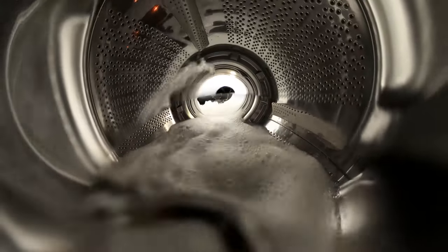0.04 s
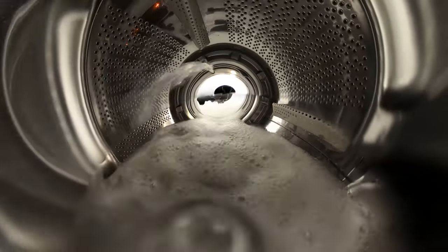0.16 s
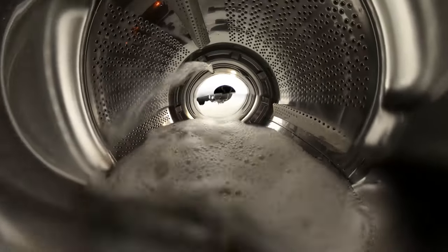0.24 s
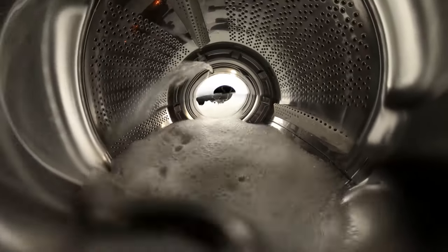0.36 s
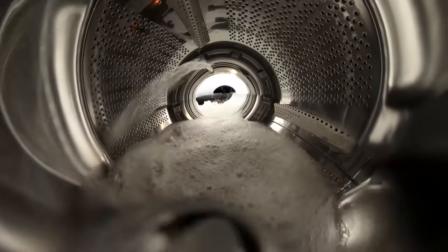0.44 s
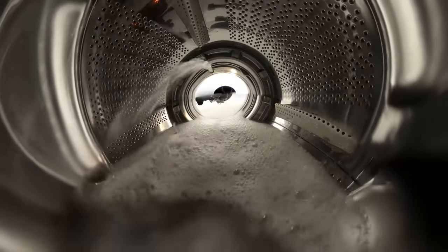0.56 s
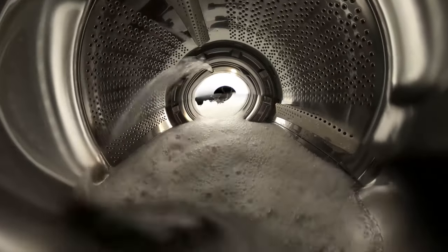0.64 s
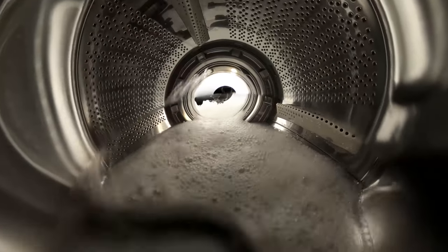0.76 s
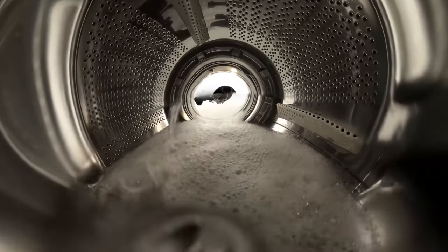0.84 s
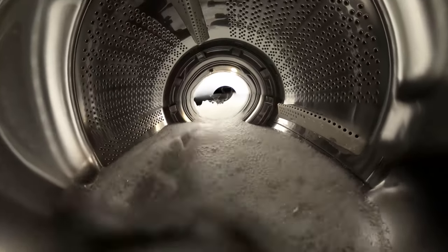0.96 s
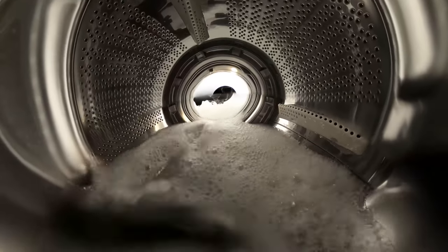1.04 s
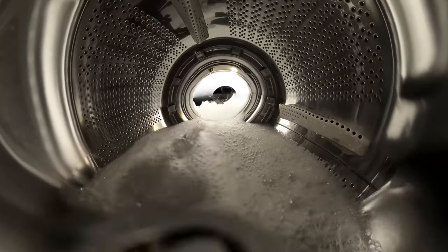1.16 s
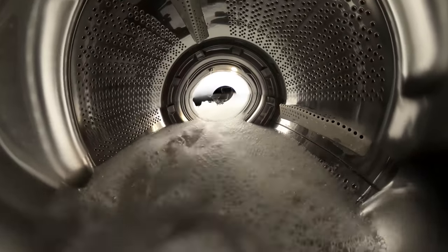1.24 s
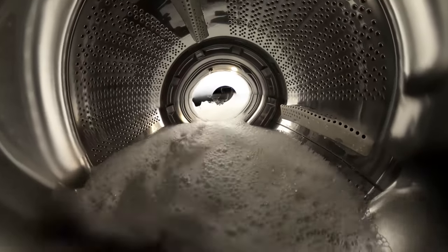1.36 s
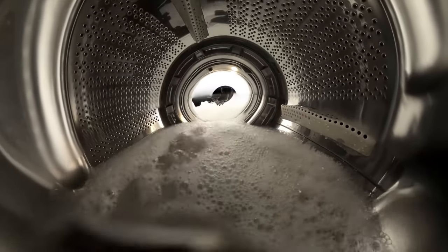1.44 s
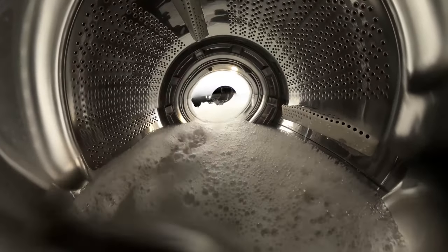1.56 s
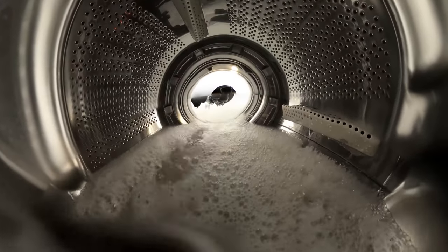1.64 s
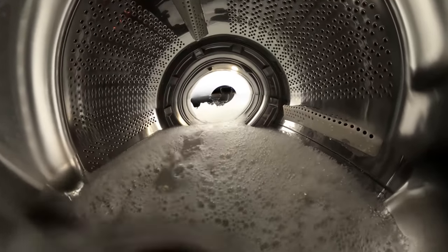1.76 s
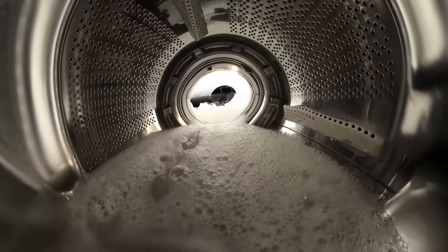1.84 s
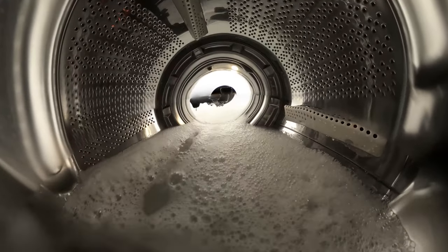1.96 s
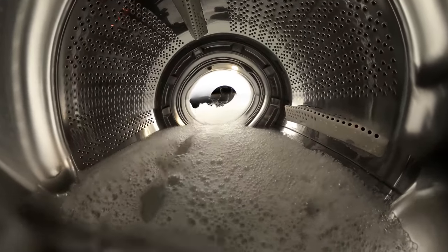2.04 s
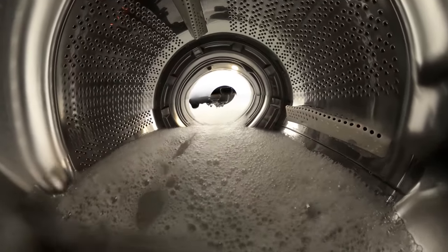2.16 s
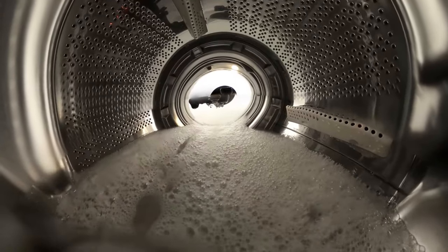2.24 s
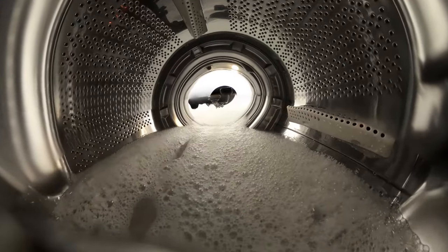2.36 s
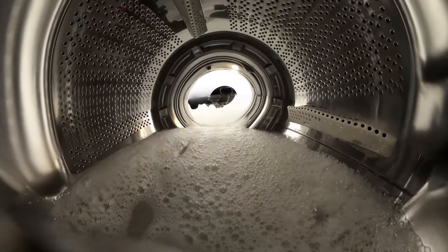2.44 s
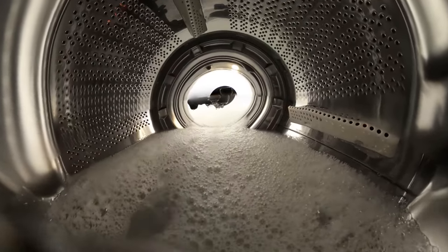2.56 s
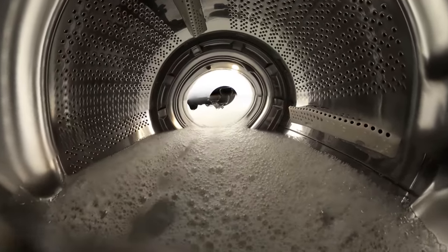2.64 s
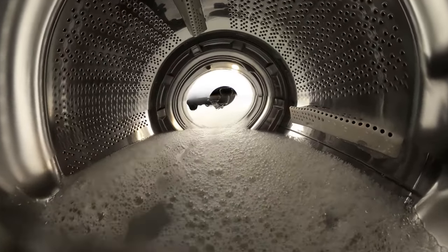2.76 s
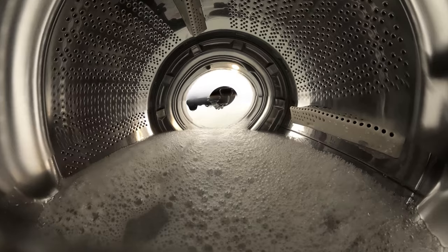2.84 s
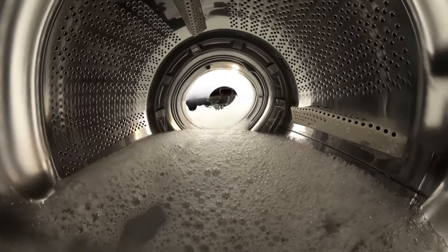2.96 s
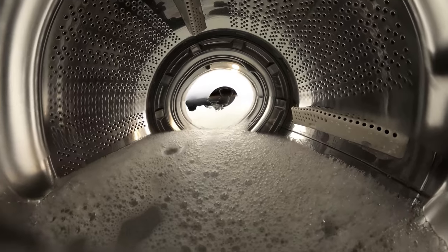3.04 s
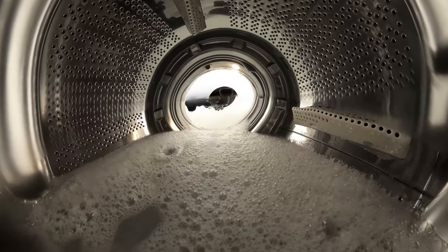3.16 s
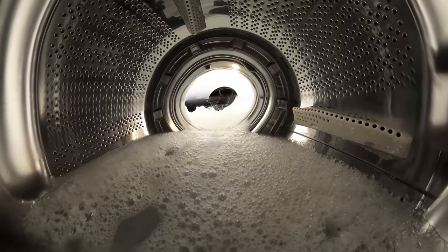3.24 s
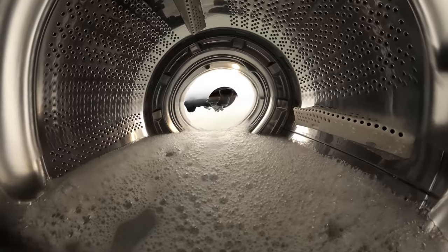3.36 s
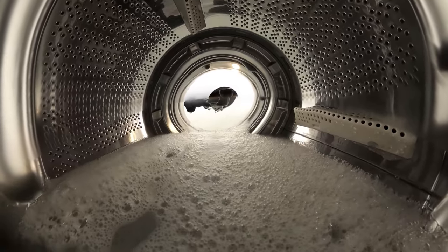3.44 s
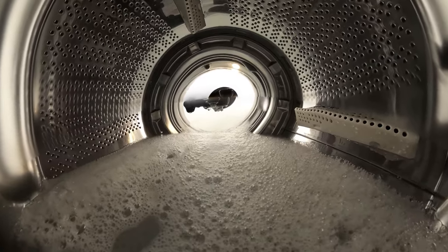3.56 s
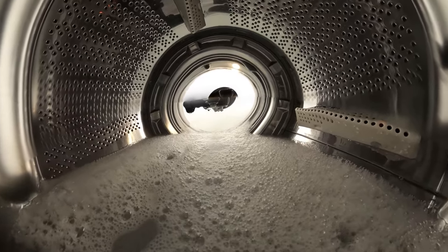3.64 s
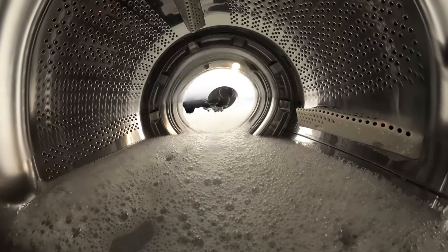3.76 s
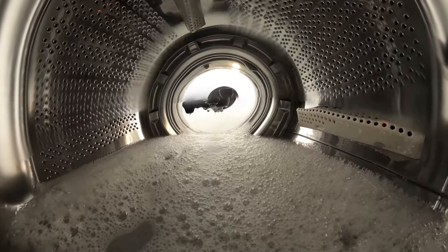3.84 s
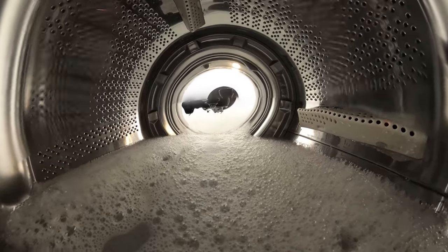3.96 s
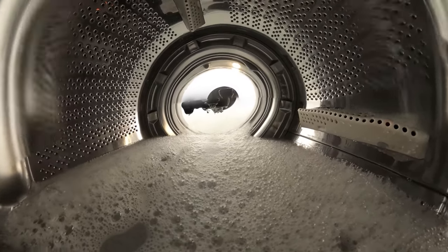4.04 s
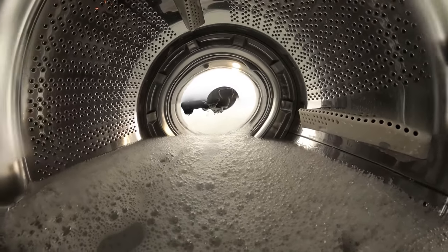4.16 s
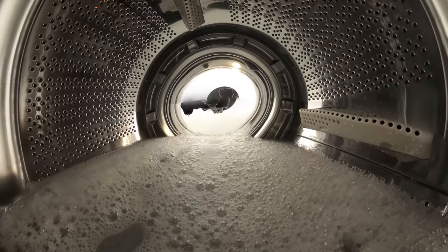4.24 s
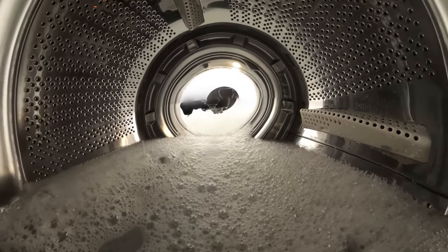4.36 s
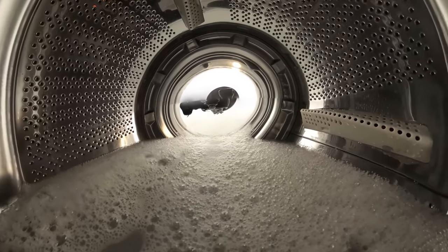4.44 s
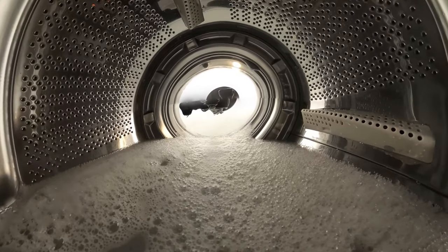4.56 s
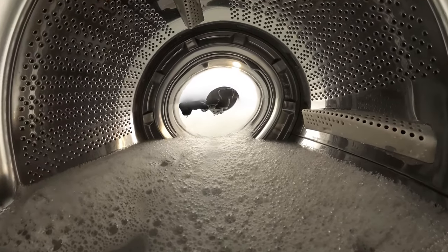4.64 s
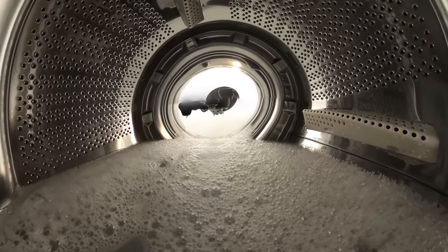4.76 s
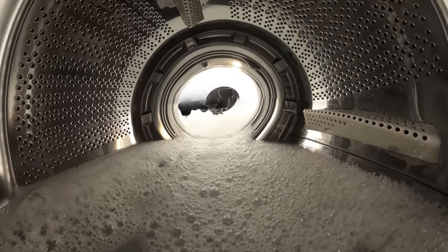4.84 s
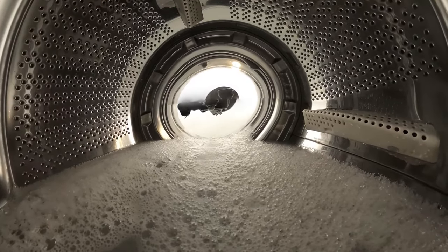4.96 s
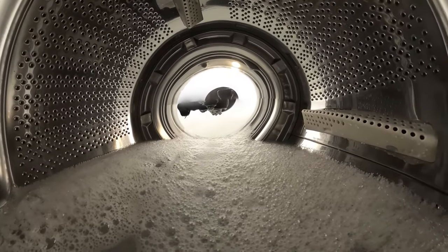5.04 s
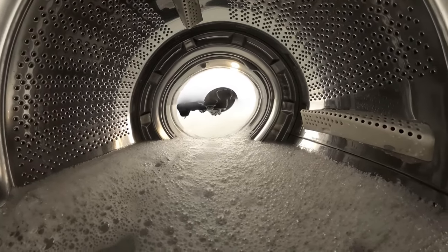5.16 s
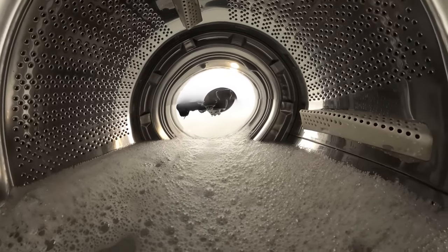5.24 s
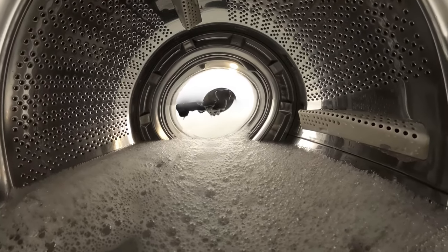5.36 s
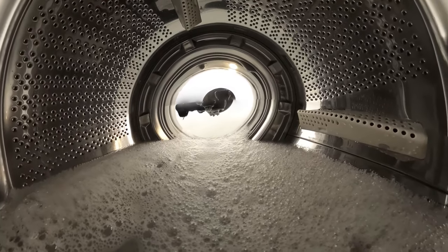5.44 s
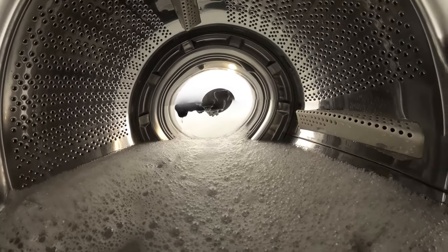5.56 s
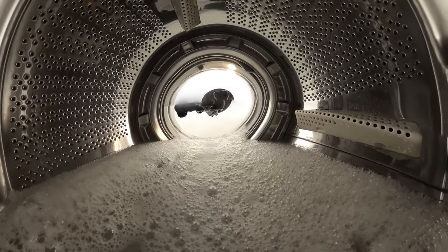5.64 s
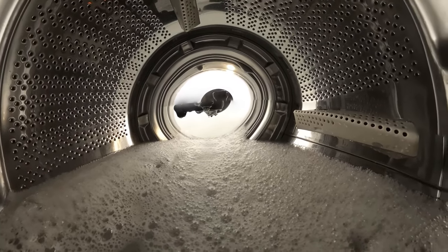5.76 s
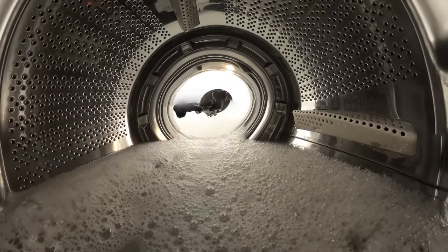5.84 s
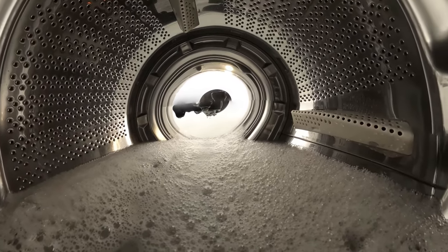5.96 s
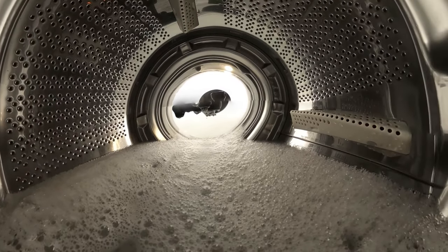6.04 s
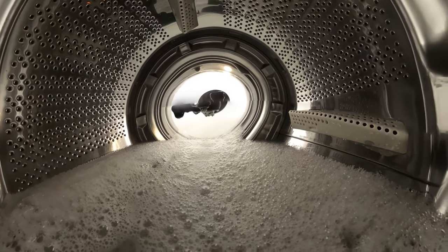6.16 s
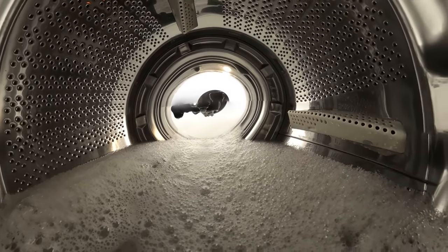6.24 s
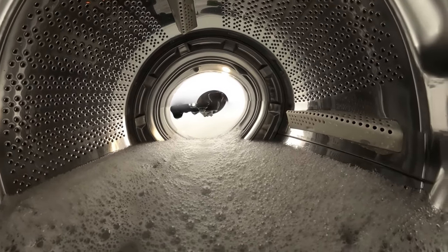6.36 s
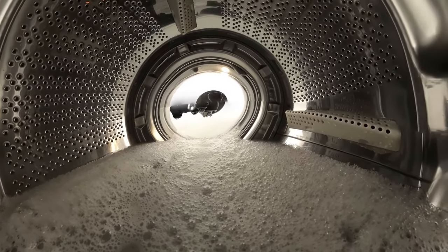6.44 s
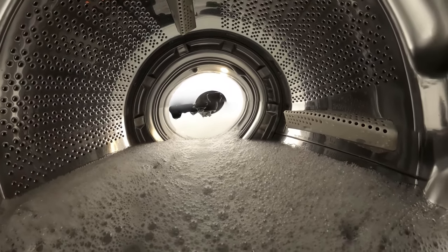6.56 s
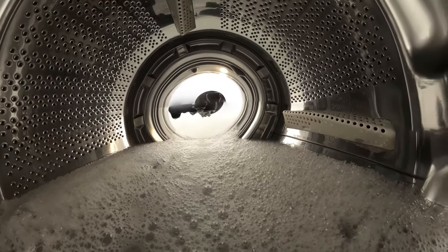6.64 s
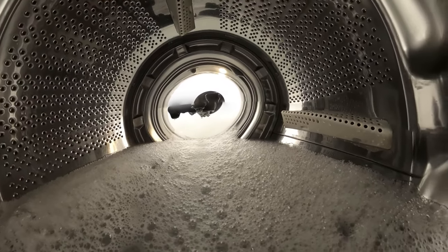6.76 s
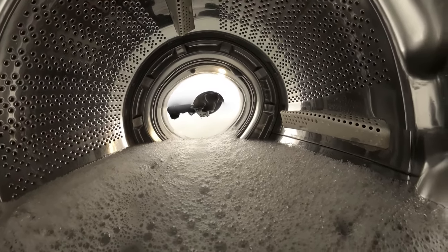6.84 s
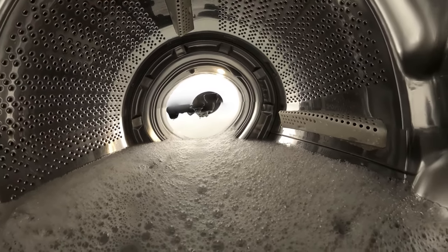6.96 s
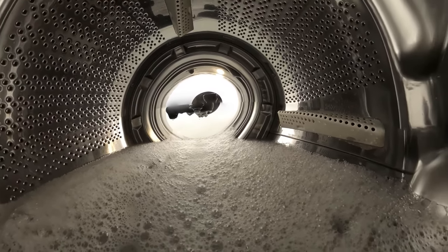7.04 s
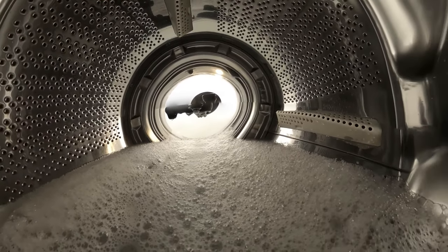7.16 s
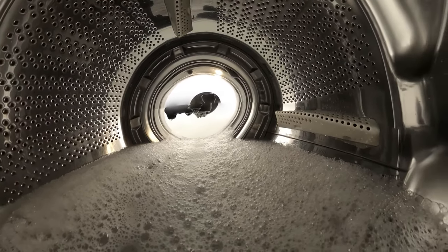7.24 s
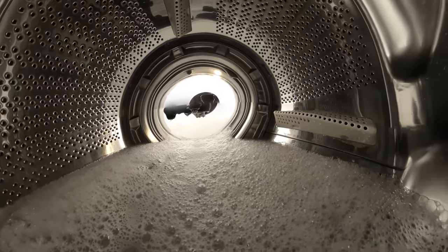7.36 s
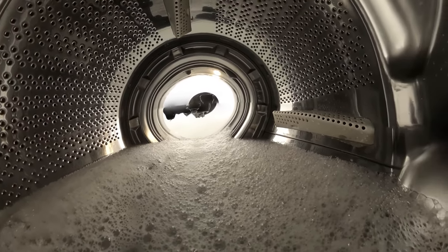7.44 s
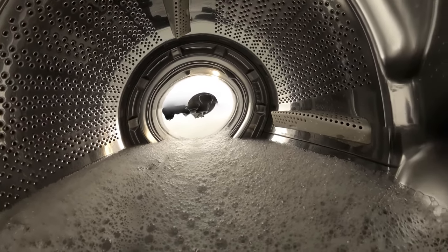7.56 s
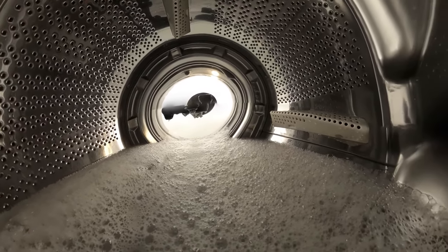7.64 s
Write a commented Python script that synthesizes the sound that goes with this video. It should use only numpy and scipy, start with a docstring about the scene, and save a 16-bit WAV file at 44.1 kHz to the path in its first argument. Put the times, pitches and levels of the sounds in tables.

```python
"""A jet of water pounds a washing machine drum, heard by a microphone in a sealed housing in the suds.
The jet is surging filtered noise: a rumble, a boom of the tub and splashes through the drum modes.
It shuts off; water laps and trickles, foam fizzes, and drops ring the drum with a rising bubble tone.
Bubbles tick on the housing modes, pushes flex its wall in soft thumps, and near the end
evenly spaced ticks and a buzz swell quickly into a hard knock."""
import sys
import numpy as np
from scipy import signal
from scipy.fft import rfft, irfft
from scipy.io import wavfile

SR = 44100
rng = np.random.default_rng(int(sys.argv[2]) if len(sys.argv) > 2 else 0)


def volts(x):
    """Linear amplitude factor 10**(x/20) for a level x in dB, scalar or array-like."""
    e = np.asarray(x, float) / 20
    return 10 ** e


def generate_wav(sig):
    """Save sig (samples, or channels by samples) to the path in sys.argv[1] as 16-bit PCM at SR."""
    pcm = np.round(np.clip(np.atleast_2d(sig).T, -1, 1) * 32767).astype(np.int16)
    wavfile.write(sys.argv[1], SR, pcm)


N = 340011  # samples

# modes of the air and steel of the drum: (frequency [Hz], width of the first resonance [Hz], level [dB])
DRUM_MODES = [(384.3, 74, -1.5), (490, 70, -1.5), (552, 59.3, 4.5), (690, 90, -0.5), (778, 53.3, 3.5),
              (1001.7, 122, -3.5), (1264, 40, -11), (1550, 213, -15), (1880, 193, -24.5), (2600, 200, -51),
              (3450, 250, -44.5), (5000, 1000, -73)]
# lower, upper and treble mode of the housing: (frequency [Hz], t60 [s])
HOUSING_MODES = [(1460, 0.0076), (2060, 0.012), (5000, 0.0031)]
# the housing wall flexing after a push:
# (time [s], envelope peak [dB], frequency [Hz], time to the peak [s])
WALL_THUMPS = [(2.762, -45.5, 102, 0.01), (2.872, -23, 89, 0.0091), (2.972, -20, 193, 0.0033),
               (3.122, -28.5, 88.8, 0.0061), (3.171, -35, 88.8, 0.0044), (3.354, -27, 98, 0.0059),
               (3.621, -24, 32.3, 0.0058), (3.632, -20.5, 32.3, 0.011), (3.636, -23, 189, 0.0033),
               (3.676, -10, 70, 0.0071), (3.688, -22.5, 139, 0.0076), (3.708, -23, 63.8, 0.004),
               (3.847, -44, 75, 0.009), (4.093, -14.5, 65, 0.0048), (4.113, -21, 76, 0.0048),
               (4.116, -28.5, 168, 0.003), (4.133, -31, 38, 0.01), (4.153, -27.5, 93.5, 0.0077),
               (4.408, -43.5, 75, 0.014), (4.689, -44.5, 83, 0.0072), (4.808, -12, 97.7, 0.006),
               (4.988, -41, 123, 0.0082), (5.002, -26, 105, 0.0081), (5.08, -38, 40, 0.015),
               (5.163, -33, 119, 0.0082), (5.215, -38, 40, 0.015), (5.45, -36.5, 75, 0.012),
               (5.733, -33, 31.8, 0.019), (5.988, -38, 32.6, 0.0049), (6.135, -12, 103, 0.0068),
               (6.157, -24.5, 60.6, 0.0075), (6.344, -40.5, 56.5, 0.012), (6.872, -37.5, 94.2, 0.0068),
               (6.944, -42, 53.8, 0.0069), (7.094, -41.5, 35, 0.015), (7.511, -33.5, 94, 0.0055),
               (7.573, -37, 32.5, 0.015), (7.63, -43, 30, 0.03)]

JET_ENDS_S = 1.18  # the layers of the settling water are fully in
KNOCK_S = 7.3692


def evened(x):
    """Scales to rms 1."""
    return x / np.sqrt(np.mean(x ** 2) + 1e-20)


def add(mix, s, sound):
    """Mixes a sound in at time s."""
    part = mix[round(s * SR):][:len(sound)]
    part += sound[:len(part)]


def level(rows):
    """A dB curve as gain at every sample."""
    return volts(np.interp(np.arange(N) / SR, *np.transpose(rows)))


def coloured(points):
    """Noise of rms 1 whose spectrum has the given shape."""
    hz, db = np.transpose(points)
    f = np.arange(N // 2 + 1) * SR / N
    shape = volts(np.interp(np.log(f + 1), np.log(hz), db))
    return evened(irfft(rfft(rng.standard_normal(N)) * shape, N))


def resonate(x, hz, width):
    """Two-pole resonance of gain 1 at its centre."""
    return signal.lfilter(*signal.iirpeak(hz, hz / width, SR), x)


def muffled(x, hz):
    """The housing and the foam take off the treble."""
    return signal.sosfilt(signal.butter(2, hz, fs=SR, output="sos"), x)


def ring(hz, t60, rise_s):
    """A damped mode with a short rise, its envelope peaking at 1."""
    t = np.arange(2000) / SR
    shape = (1 - np.exp(-t / rise_s)) * volts(-60 * t / t60)
    return shape / shape.max() * np.sin(2 * np.pi * hz * t)


def grains(per_s, spread_db, length_s, steady):
    """Noise in short random bursts of uneven size over a steady part."""
    starts = rng.random(N) < per_s / SR
    size = volts(spread_db * np.minimum(rng.exponential(1, N), 4)) * starts
    decay = np.exp(-np.arange(3000) / SR / length_s)  # of the power
    bursts = np.sqrt(abs(signal.oaconvolve(size ** 2, decay)[:N]))
    return evened((evened(bursts) + steady) * rng.standard_normal(N))


def drum(x):
    """Falling water sounds through the drum's modes; x may hold one row for each mode."""
    x = np.broadcast_to(x, (len(DRUM_MODES), x.shape[-1]))
    out = 0
    for row, (hz, width, db) in zip(x, DRUM_MODES):
        out = out + volts(db) * resonate(resonate(row, hz, width), hz, 1.36 * width)
    return out


def gurgle(per_s, spread_db, length_s, shared):
    """Bubbles excite each drum mode on its own, splashes all modes together."""
    own = np.array([grains(per_s, spread_db, length_s, 0.58) for _ in DRUM_MODES])
    splashes = grains(250, 1.8, 0.015, 0.3)
    return evened(drum(own + shared * splashes))


def jet():
    """The surging jet shakes the housing, booms the tub and splashes; shut off, it dies fast, then drains."""
    # shape of the rumble: (frequency [Hz], relative level per Hz [dB])
    rumble_shape = [(8.8, -26), (15, -10), (65, 4), (101, 4), (129, -9.5), (150, -3), (175, -6.5),
                    (230, -39.5), (390, -120)]
    # surges of the jet: (time [s], rise above steady flow [dB], length [s])
    surges = [(0.116, 5.5, 0.023), (0.322, 4, .02), (0.388, 5, .04), (0.539, 5.5, 0.031),
              (0.791, 3.5, 0.053), (0.882, 6, 0.022)]
    # boom of the tub under the jet: (time [s], level [dB])
    boom_level = [(0, -32), (0.11, -39), (0.18, -30), (0.39, -36), (0.466, -17), (0.53, -22.5),
                  (0.574, -29.5), (0.778, -25), (0.914, -24.5), (0.97, -27.5), (1.03, -49.5), (1.2, -62.5),
                  (1.6, -90)]
    rumble_db, splash_db = -22.5, -31.5  # in steady flow
    shut_s, shut_db_per_s = 0.922, 170

    t = np.arange(N) / SR
    surge_db = sum(db * np.exp(-((t - s) / length) ** 2) for s, db, length in surges)
    since_shut = np.maximum(t - shut_s, 0)
    shut_db = -shut_db_per_s * since_shut
    rumble_fall_db = np.maximum(shut_db, -15 - 25 * since_shut)
    splash_fall_db = np.maximum(shut_db, -6 - 52 * since_shut)

    rumble = coloured(rumble_shape) * volts(rumble_db + rumble_fall_db + surge_db)
    tub_hz = 204.7
    boom = evened(resonate(resonate(rng.standard_normal(N), tub_hz, 6.7), tub_hz, 60))
    splash = gurgle(per_s=70, spread_db=4.66, length_s=0.008, shared=0.21)
    splash *= volts(splash_db + splash_fall_db + 1.14 * surge_db)  # surges show a little more in the splash
    return rumble + boom * level(boom_level) + splash


def hiss():
    """A fine noise hiss that creeps up until the knock."""
    # shape of the hiss: (frequency [Hz], relative level per Hz [dB])
    hiss_shape = [(1500, -16.5), (2600, -5.5), (3800, -6.5), (5000, 1), (7300, -1.5), (8500, -12.5),
                  (10500, -10.5), (12500, -36), (16000, -45)]
    # its course: (time [s], level [dB])
    hiss_course = [(0, -106), (1.1, -94.5), (2.7, -93.5), (3.3, -82), (4.2, -77), (5.5, -74.5), (7.33, -72),
                   (7.38, -88), (7.71, -93)]
    return coloured(hiss_shape) * level(hiss_course)


def drop(db, hz, t60, spray_db, noise):
    """A bubble plops at its own pitch, a crackly splash picks out drum modes near it, spray hisses above."""
    t = np.arange(len(noise)) / SR
    splash = noise ** 3 * (volts(-60 * t / t60) + 1.2 * np.exp(-t / 0.0013))  # cubing makes it crackle
    ringing = drum(muffled(resonate(splash, hz, 280) + 0.51 * splash, 1500))
    plop = resonate(resonate(splash, hz, 81), hz, 280)
    # the trapped bubble's tone climbs as it nears the surface
    rise_per_s, bubble_t60_s = 3.1, 0.06
    tone = np.sin(2 * np.pi * hz * t * (1 + rise_per_s * t / 2))
    bubble = (1 - np.exp(-t / 0.003)) * volts(-60 * t / bubble_t60_s) * tone
    spray = muffled(resonate(resonate(splash, 1400, 1400), 1400, 1200), 1800)
    sound = ringing / abs(ringing).max() + 0.67 * plop / abs(plop).max() + volts(-6.5) * bubble
    return volts(db) * sound / abs(sound).max() + volts(db + spray_db) * spray / abs(spray).max()


def tick(db, hz, upper_db, treble_db, snap_db):
    """A burst rings the three housing modes, the lowest detuned by the foam on it, and adds a snap."""
    (_, lower_t60), upper, treble = HOUSING_MODES
    modes = ring(hz, lower_t60, 0.0013)
    modes += volts(upper_db) * ring(*upper, 0.0012)
    modes += volts(treble_db) * ring(*treble, 0.0006)
    snap = volts(snap_db) * ring(918, 0.0037, 0.0014)
    snap += volts(treble_db - 3) * ring(3180, 0.0028, 0.00034)
    return volts(db) * muffled(modes + snap, 4300)


def after_jet():
    """Gain that fades in over 50 ms as the jet dies."""
    return np.clip((np.arange(N) / SR - JET_ENDS_S) * 20 + 1, 0, 1)


def hush():
    """Gain that falls by 19.5 dB in the 50 ms after the knock."""
    return volts(-19.5 * np.clip((np.arange(N) / SR - KNOCK_S) / 0.05, 0, 1))


def settling(rest_db, start_db, settle_s, stir_db, wander_db):
    """Gain of a water layer: it calms after the jet, wanders slowly and is stirred by pushes on the housing."""
    t = np.arange(N) / SR
    wander = 0
    for f in np.geomspace(1.5, 8, num=20):
        wander = wander + np.sin(2 * np.pi * (f * t[::64] + rng.random())) / np.sqrt(f)
    wander = np.repeat(evened(wander), repeats=64)[:N]
    calming_db = start_db * np.exp(-np.maximum(t - JET_ENDS_S, 0) / settle_s)
    calm = volts(rest_db + calming_db + wander_db * wander)

    rise_s, fade_s, db_per_push_db = 0.025, 0.11, 0.44  # stirring grows more slowly than the push
    stir_shape = (1 - np.exp(-t[:SR] / rise_s)) * np.exp(-2 * t[:SR] / fade_s)
    stirred_power = np.zeros(N)
    for s, db, *_ in WALL_THUMPS:
        add(stirred_power, s, volts(2 * (db_per_push_db * db + stir_db)) * stir_shape)
    return np.sqrt(calm ** 2 + stirred_power) * after_jet()


def settling_water():
    """After the jet the water sways as low noise, laps as a band of noise and trickles through the drum modes."""
    # shapes of the slow sway and the lapping: (frequency [Hz], relative level per Hz [dB])
    sway_shape = [(8, -12), (14, 3), (30, 2), (65, -6.5), (90, -28), (200, -83)]
    lapping_shape = [(50, -44.5), (80, 2.5), (140, -9.5), (200, -2.5), (260, -16.5), (320, -32.5),
                     (600, -79)]
    sway = coloured(sway_shape) * settling(
        rest_db=-61, start_db=19, settle_s=0.65, stir_db=-34, wander_db=3.5)
    lapping = coloured(lapping_shape) * settling(
        rest_db=-64, start_db=10.5, settle_s=1.4, stir_db=-47, wander_db=2.5)
    trickle = gurgle(per_s=80, spread_db=3.0, length_s=0.034, shared=0.6) * settling(
        rest_db=-61.5, start_db=8.5, settle_s=0.87, stir_db=-57, wander_db=1.5)
    return sway + (lapping + trickle) * hush()


def fizz():
    """Countless tiny foam bursts excite the housing modes."""
    # course before the fade-in and the hush: (time [s], level [dB])
    fizz_course = [(1.15, -85), (1.4, -75), (1.55, -62.5), (1.7, -86), (2.7, -81), (3.12, -67), (4.2, -67),
                   (6.54, -67), (7.31, -70)]
    bursts = grains(per_s=120, spread_db=5.5, length_s=0.003, steady=0.5)
    out = np.zeros(N)
    for (hz, _), width, db in zip(HOUSING_MODES, (200, 320, 900), (0.1, -5, -34)):
        out += volts(db) * resonate(resonate(bursts, hz, width), hz, 510)
    return evened(out) * level(fizz_course) * after_jet() * hush()


def thump(db, hz, peak_s):
    """A slow, heavily damped swing that swells and dies."""
    t = np.arange(SR) / SR
    u = t / peak_s
    return volts(db) * (u * np.exp(1 - u)) ** 1.46 * np.sin(2 * np.pi * hz * t)


def faint_ticks():
    """Nine faint bursts on the housing at random times, each with its own size and tuning."""
    out = np.zeros(N)
    from_s, to_s = 2.8, 5.4
    for when, size, tune, upper in rng.random((9, 4)):
        faint = tick(db=-56 + 6 * size, hz=1350 + 200 * tune, upper_db=-12 * upper, treble_db=-18, snap_db=3)
        add(out, from_s + (to_s - from_s) * when, faint)
    return out


def spits():
    """Tiny bright bursts of foam: fast-decaying noise around 5.6 kHz."""
    # (time [s], peak level [dB])
    spit_list = [(3.496, -58), (4.3348, -49.5), (4.404, -55.5), (4.6337, -56.5), (5.215, -57), (5.449, -56),
                 (5.61, -53.5), (6.2093, -52.5), (6.386, -50), (6.6458, -53), (6.8967, -56), (7.1053, -54)]
    out = np.zeros(N)
    decay = volts(-60 * np.arange(2000) / SR / 0.046)
    for (s, db), noise in zip(spit_list, rng.standard_normal((len(spit_list), 2000))):
        spit = muffled(resonate(noise, 5600, 4000), 6600) * decay
        add(out, s, volts(db) * spit / abs(spit).max())
    return out


def knock():
    """Evenly spaced growing ticks, noise and tones swell into a hard knock, then low swings and a slow sag."""
    # tones of the swell: (frequency [Hz], level at gain 1 of the swell [dB])
    swell_tones = [(52, -9), (94, -24), (420, -21), (980, -21), (5000, -41), (10000, -56.5)]
    # low swings and a slow sag after the knock:
    # (time [s], envelope peak [dB], frequency [Hz], time to the peak [s])
    low_swings = [(7.3694, -4, 180, .002), (7.3735, -10, 13, .0065), (7.405, -33, 2.2, .05)]
    pulse_gap_s, growth_db_per_s = 0.01067, 811.5

    t = np.arange(N) / SR - KNOCK_S
    # the swell stops growing 4.7 ms before the knock and ends at it
    growth = volts(growth_db_per_s * np.minimum(t + 0.0047, 0)) * (t < 0)
    band_noise = resonate(rng.standard_normal(N), 520, 400)
    swell_noise = volts(-22) * evened(muffled(muffled(band_noise, 750), 750))
    buzz = sum(volts(db) * np.sin(2 * np.pi * hz * t) for hz, db in swell_tones)
    out = growth * (swell_noise + buzz)

    pulse = volts(-1.5) * ring(2300, 0.0015, 0.00005) + ring(830, 0.004, 0.0001)
    for k in range(1, 5):  # counted back from the knock; pulses grow faster than noise and tones
        before_s = k * pulse_gap_s
        add(out, KNOCK_S - before_s - 0.0003, volts(2 - 1.7 * growth_db_per_s * before_s) * pulse)

    strike = ring(1300, 0.0022, 0.00007)
    strike += volts(-56) * ring(3500, 0.009, 0.00005)
    strike += volts(-26.5) * ring(9800, 0.001, 0.00005)
    add(out, KNOCK_S - 0.0003, -volts(9) * strike)
    add(out, KNOCK_S + 0.009, volts(-37) * pulse)  # a small rebound
    for s, *row in low_swings:
        add(out, s, thump(*row))
    return out


def scene():
    """Mixes the water and foam layers with the drops, ticks, thumps and the knock."""
    # drops falling into the suds:
    # (time [s], peak [dB], frequency [Hz], splash t60 [s], spray above the peak [dB])
    drop_list = [(0.056, -25, 776, 0.081, -6), (0.097, -13.5, 557, 0.052, -28),
                 (0.134, -17.5, 756, 0.087, -41), (0.188, -28.5, 600, 0.074, -12),
                 (0.308, -18, 554, 0.033, -27), (0.434, -17, 540, 0.13, -33), (0.533, -17, 762, 0.059, -28),
                 (0.798, -18, 516, 0.095, -24), (0.824, -18, 565, 0.057, -20),
                 (0.884, -19, 547, 0.069, -30), (0.918, -24.5, 398, 0.092, -11.5),
                 (0.94, -18, 774, 0.086, -18.5), (1.034, -24.5, 490, 0.05, -14),
                 (1.066, -24.5, 1116, 0.059, -17), (1.127, -39, 750, 0.12, -9),
                 (1.344, -39, 500, 0.16, -18), (1.437, -42.5, 375, 0.032, -20),
                 (1.474, -44.5, 1575, 0.097, -2), (1.54, -43.5, 1550, 0.074, -13),
                 (1.563, -40.5, 740, 0.044, -13), (1.63, -35, 1330, 0.083, -20),
                 (1.768, -41, 587, 0.21, -23), (2.181, -42, 610, 0.14, -26), (2.373, -40.5, 516, 0.11, -23),
                 (2.628, -41.5, 1000, 0.079, -25), (3.074, -41, 552, 0.064, -22),
                 (3.393, -49, 544, 0.06, -18), (3.631, -32.5, 427, 0.079, -8),
                 (3.728, -30.5, 795, 0.049, -24), (3.827, -36.5, 597, 0.074, -12.5),
                 (4.116, -40, 400, 0.13, -6), (4.38, -45, 724, 0.12, -13), (4.455, -37, 584, 0.057, -14),
                 (4.991, -46, 634, 0.065, 0), (5.215, -33.5, 673, 0.12, -24),
                 (5.441, -34.5, 829, 0.062, -10.5), (5.615, -45, 790, 0.055, -2),
                 (6.051, -39, 783, 0.032, -24), (6.24, -45, 650, 0.11, -19), (6.383, -41, 1026, 0.2, -3),
                 (6.541, -41.5, 870, 0.034, -12), (6.638, -37, 727, 0.18, -22),
                 (6.706, -43, 770, 0.092, -15), (7.092, -44, 628, 0.22, -6), (7.432, -57, 904, 0.12, -19)]
    # bubbles bursting on the housing, levels before muffling: (time [s], lower mode [dB], its frequency [Hz],
    # then relative to the lower mode: upper mode [dB], treble mode [dB], broad snap [dB])
    tick_list = [(1.0305, -34, 1550, -14, -37, -21), (2.686, -48, 1430, -3.5, -12, 4),
                 (2.7646, -44.5, 1390, -3, -1.5, 1.5), (2.8712, -34, 1330, -10, -33, -1),
                 (2.9702, -7.5, 1275, -11.5, -25.5, -5), (3.1206, -20, 1430, 3, -23, 2.5),
                 (3.1654, -42, 1540, 0.6, -6.5, -41), (3.3082, -45, 1260, -1, -16, 5),
                 (3.3316, -35, 1490, -9, -52, -7), (3.3531, -23, 1470, -5, -40, -29),
                 (3.6739, -19, 1400, -35, -24, -5), (3.8472, -34, 1470, -12, -9.5, -27),
                 (3.8881, -47, 1440, -9, -26, -8), (3.9159, -45, 1510, -12, -31, -13),
                 (4.0548, -43, 1400, -11, -23, -6), (4.0904, -24.5, 1446, -18, -37, -4.5),
                 (4.114, -37, 1490, -12, -23, 3), (4.154, -34.5, 1380, -8, -23, -20),
                 (4.1853, -47, 1450, -7, -19, -13), (4.6918, -39, 1460, -22, -22, -1.5),
                 (4.805, -11.5, 1440, -39, -39.5, -14.5), (4.9806, -44.5, 1390, -12, -21, -4),
                 (5.01, -31.5, 1560, 3.5, -2.5, -2.5), (5.0379, -43, 1530, -8, -16, -11),
                 (5.0627, -33, 1510, -7.5, -23, -14), (5.158, -43, 1520, -21, -26, -18),
                 (5.165, -32, 1510, -13, -18, -9), (5.6276, -46, 1460, -6, -0.5, -12),
                 (5.7406, -42.5, 1390, -11, -11, 9), (5.9883, -46, 1430, -22, -16, 5),
                 (6.0418, -46.5, 1490, -4.5, -32, 3), (6.133, -28, 1380, 1, -7, 6.5),
                 (6.2337, -44.5, 1420, -22, -27, 3), (6.5973, -29.5, 1450, -5, -2.5, -9),
                 (6.8716, -39, 1480, -13, -31.5, -30), (7.5102, -44, 1395, -25.5, -45, -21),
                 (7.5755, -45.5, 1380, -11, -38, 7)]
    mix = jet() + hiss() + settling_water() + fizz() + faint_ticks() + spits() + knock()
    for (s, *row), noise in zip(drop_list, rng.standard_normal((len(drop_list), 8000))):
        add(mix, s, drop(*row, noise))
    for s, *row in tick_list:
        add(mix, s, tick(*row))
    for s, *row in WALL_THUMPS:
        add(mix, s, thump(*row))
    return mix[None]


def band_limit(x):
    """A steep low-pass at the top of the band."""
    return signal.sosfilt(signal.butter(12, 16500, fs=SR, output="sos"), x)


def record(dry):
    """The microphone adds its own faint noise, and full scale clips."""
    # shape of the microphone noise: (frequency [Hz], relative level per Hz [dB])
    self_noise = [(800, -10), (2500, 0), (4500, -5), (7000, -15.5), (12000, -29.5)]
    heard = np.clip(dry + volts(-86.5) * coloured(self_noise), -1, 1)
    return band_limit(heard)


dry = scene()
out = record(dry)
generate_wav(out)
```